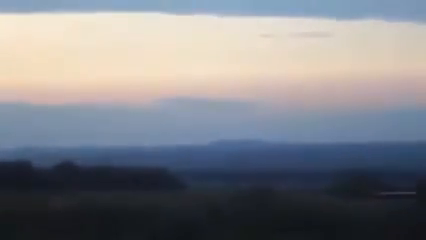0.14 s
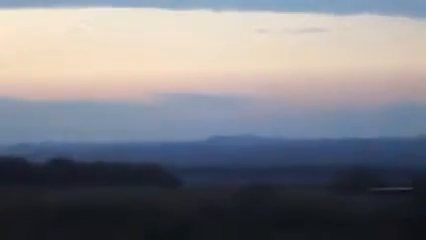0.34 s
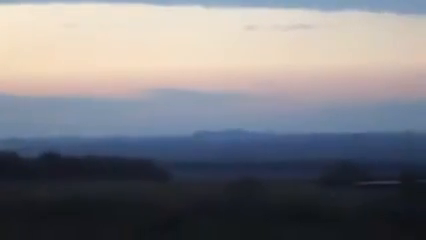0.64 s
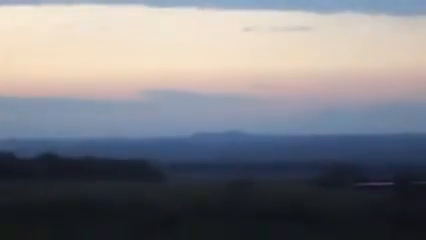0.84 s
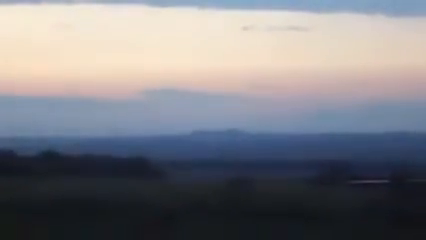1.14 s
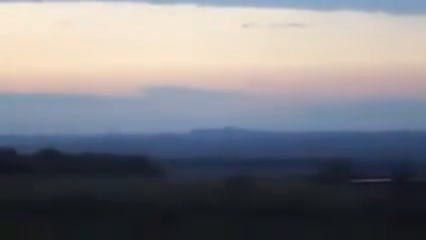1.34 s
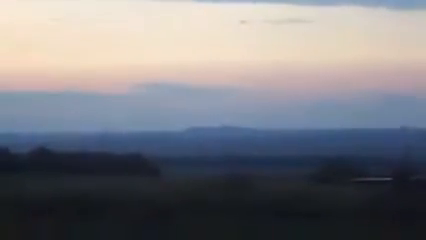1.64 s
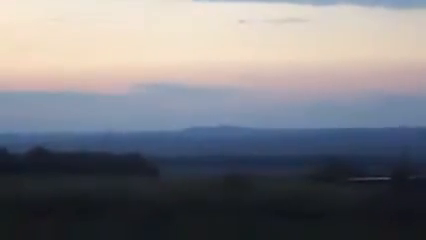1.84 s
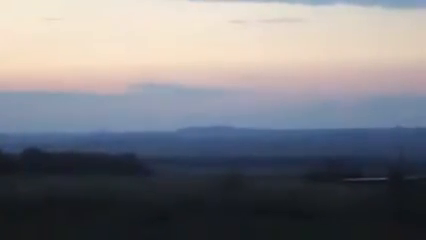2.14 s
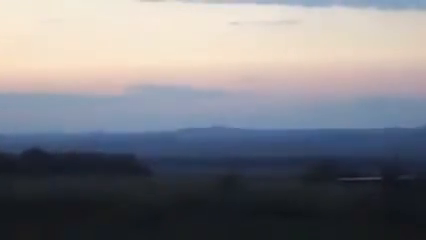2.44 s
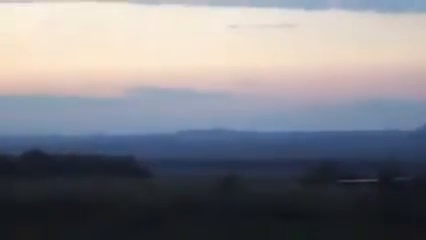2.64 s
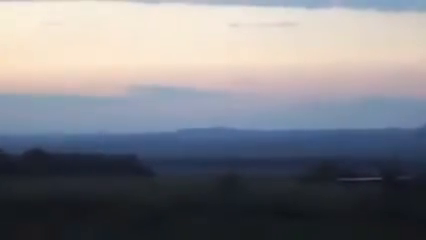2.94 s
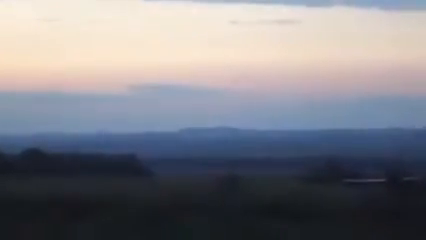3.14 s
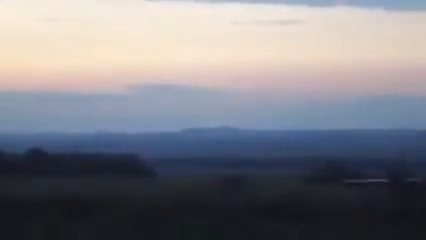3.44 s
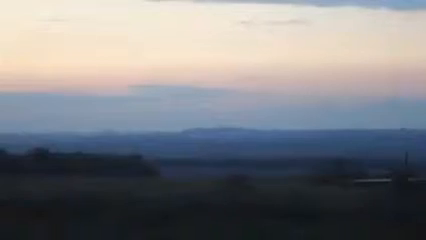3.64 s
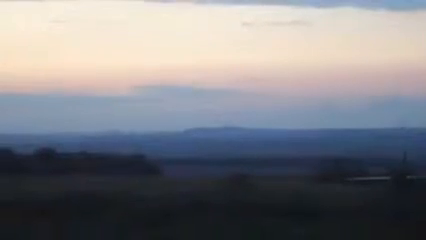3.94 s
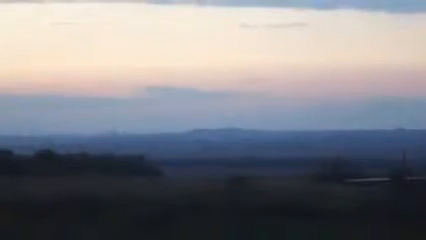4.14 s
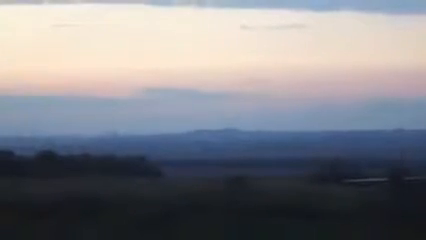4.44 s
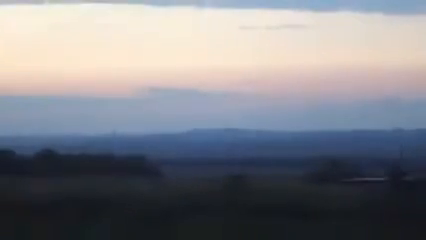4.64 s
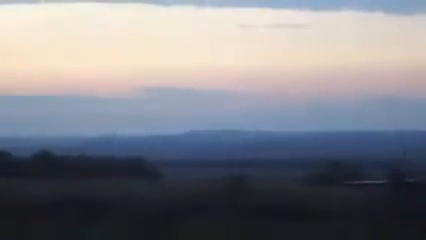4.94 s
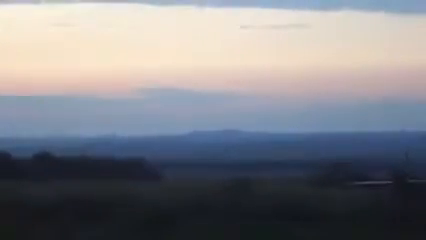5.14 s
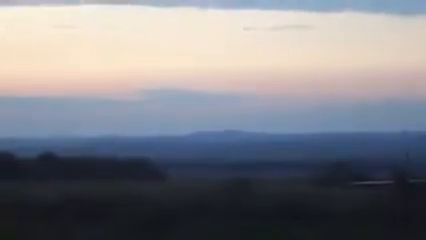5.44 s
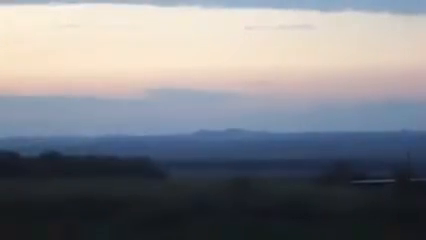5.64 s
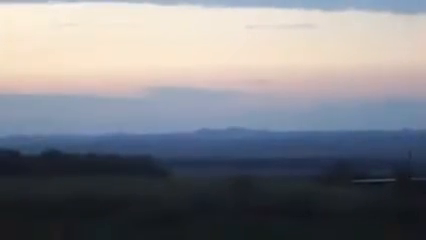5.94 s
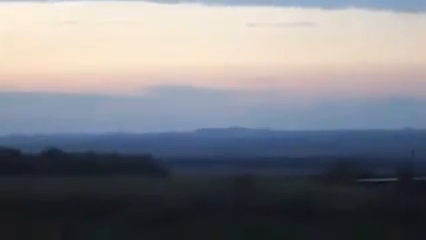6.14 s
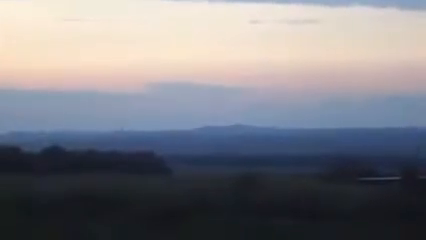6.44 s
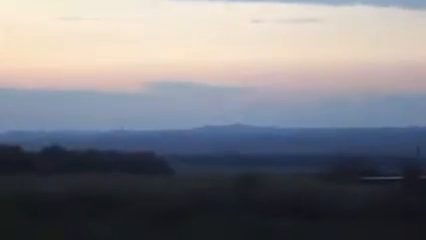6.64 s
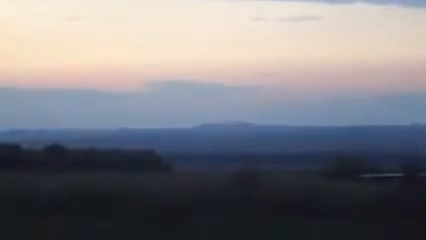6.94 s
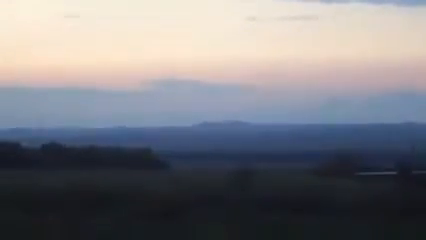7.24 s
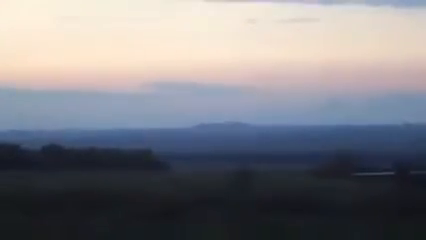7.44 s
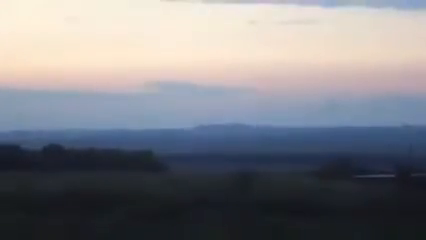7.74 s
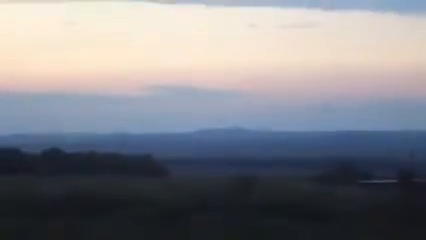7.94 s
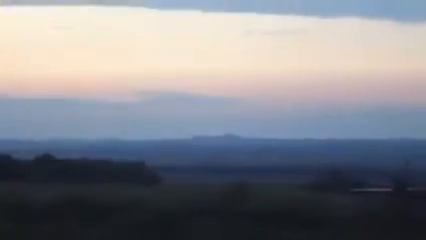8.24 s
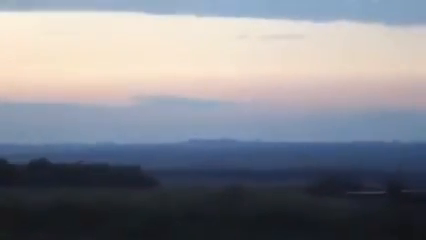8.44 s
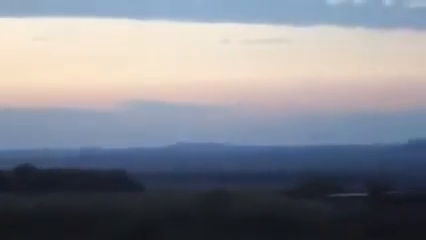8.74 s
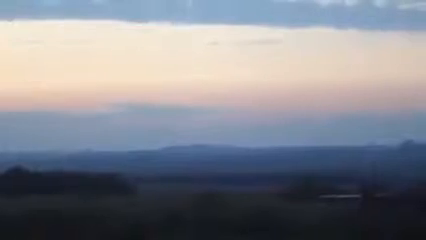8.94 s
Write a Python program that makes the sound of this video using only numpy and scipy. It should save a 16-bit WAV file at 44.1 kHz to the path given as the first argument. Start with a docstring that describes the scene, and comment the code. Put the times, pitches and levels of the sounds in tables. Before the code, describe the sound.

A heavy gun blast cracks and thuds at once from far across open fields, its echo rolling off hills. After about two seconds a second, denser blast arrives, and a third less than a second later, both dissolving into long dull rumble. Underneath are steady airy hush, high cricket rasp, faint short bird whistles and small handling ticks on a hand-held microphone, most noticeable near eight seconds.

```python
"""Distant heavy guns boom over open country at dusk: each blast arrives as a bunch of fronts by different
paths, then rolls on in echoes from hills and woods. Fronts are pressure pulses; bunches, roll and deep
boom are random reflections, filtered and shaped. Bush crickets rasp in the grass as gated noise, a small
bird calls now and then in bent sine whistles, and a hand-held camera body ticks as resonant noise.
Steady noise gives the hush of the fields."""
import sys
import numpy as np
from scipy import signal
from scipy.fft import rfft, irfft
from scipy.io import wavfile
from scipy.ndimage import uniform_filter1d

SR = 44100
rng = np.random.default_rng(int(sys.argv[2]) if len(sys.argv) > 2 else 0)


def file_out(sig):
    """Save sig as 16-bit WAV at sys.argv[1]."""
    # one column per channel
    cols = np.atleast_2d(sig).T
    # limit, then scale
    lim = np.clip(cols, -1, 1)
    pcm = np.round(lim * 32767).astype(np.int16)
    wavfile.write(sys.argv[1], SR, pcm)


N = 400869  # length of the scene, samples

# single fronts that stand out of the bunches: onset t/s, peak level/dB, treble corner f/Hz
FRONTS = [(0.0134, -9.5, 1300), (0.0156, -11.5, 1350), (0.0241, -9.5, 1300), (0.0611, -18, 594),
          (2.0329, -12.5, 1080), (2.0715, -7, 1300), (2.1086, -15, 2600), (2.122, -12.5, 4500),
          (2.1406, -14.5, 2600), (2.9091, -12, 3600), (2.9297, -17, 1100)]
PHASE_MS = 1.5  # positive phase of a front
# bunches of arrivals: peak t/s, level/dB, fall to a tenth t/ms, centre f/Hz
BUNCHES = [(.018, -15.5, 29, 280), (.02, -25.5, 29.4, 1350), (.058, -16, 26, 232), (.096, -27, 22, 235),
           (0.129, -26, 22, 235), (.216, -32.5, 52, 920), (.53, -42, 35, 550), (.757, -33.5, 30, 237),
           (1.756, -40, 26, 650), (1.768, -31.5, 42, 238), (2.026, -23.5, 18, 600), (2.035, -14, 16, 600),
           (2.046, -29.5, 21, 1300), (2.071, -17, 26, 546), (2.086, -18.5, 22.4, 650),
           (2.103, -16, 36, 520), (2.095, -29, 40, 1700), (2.121, -24, 24, 1710), (2.138, -15, 12, 450),
           (2.173, -23, 26, 400), (2.241, -23, 37, 447), (2.293, -25.5, 50, 500), (2.35, -28, 65, 900),
           (2.467, -24, 38, 440), (2.864, -27, 15, 330), (2.884, -24.5, 30, 1300), (2.9, -15.5, 22.8, 1130),
           (2.907, -12.5, 7.5, 380), (2.931, -20, 8.5, 700), (2.95, -21.5, 80, 450), (3.01, -25, 48, 394),
           (3.122, -22.5, 35, 250), (3.205, -35, 34, 1020), (3.35, -41, 33, 450), (3.445, -32.5, 58, 570),
           (3.593, -33.5, 13, 647), (3.765, -34, 31, 300), (3.82, -30, 55, 457), (3.865, -38.5, 90, 57.7),
           (3.87, -34.5, 80, 260), (4.01, -42, 30, 350), (4.306, -41.5, 42, 224), (5.172, -44, 52, 397),
           (6.175, -48, 55, 270), (6.469, -50, 40, 310), (6.859, -49.5, 40, 240), (7.295, -45.5, 85, 243),
           (8.942, -51, 62, 230)]
# width of the range a reflector favours, low bunches being narrow thuds: centre f/Hz, width/octave
BREADTH = [(58, 0.61), (230, 0.29), (300, 0.83), (450, 1.16), (650, 1.02), (1130, 0.87), (1700, 1.5)]
RISE_SHARE = 0.33  # rise time of a bunch over its fall time
# colour of a blast after the ground, the air and the microphone: f/Hz, relative level/(dB per Hz)
BLAST_SPECTRUM = [(82, -43), (140, -14.5), (226, 3), (291, 1), (417, -3.5), (694, 1), (759, -4.5),
                  (922, -9), (1360, -13), (1650, -21.5), (1920, -20.5), (2260, -29.5), (2630, -29),
                  (3390, -43.5), (5000, -54), (6500, -84), (11000, -120)]
# blasts: t/s, swell/s, roll level/dB, fade/(dB/s), extra air loss/(dB/kHz),
# deep boom level/dB, swell of the boom/s, fade of the boom/(dB/s)
BLASTS = [(-.02, 0.018, -29.5, 18, 1.5, -36.5, 0.033, 24), (1.15, 0.34, -48, 4, -2, -58.5, .4, 10.5),
          (2.018, .04, -25, 16, 0.5, -42.5, .1, 24), (2.05, 0.068, -19.5, 106, 2, -43, .09, 41),
          (2.859, 0.027, -25, 23, -1.5, -32.5, 0.11, 52), (3.4, .08, -40.5, 30, 4, -42.5, 0.049, 52),
          (3.76, 0.072, -40, 35.5, 3.5, -46, 0.051, 58), (5.9, .4, -58.5, 4.5, 13, -66, .45, 12),
          (7.0, 0.16, -59, 11.5, 2, -73, .2, 11)]
# unevenness of the terrain, as a spectrum of level wander: f/Hz, relative level/dB
TERRAIN_SPECTRUM = [(2, -17.5), (6, 18.5), (30, 1.5), (60, -81.5)]
ECHOES_PER_S = 4000  # mean rate of reflections
# farthest slopes answer weakly (dB re the blast), long and ever duller
FAR_DB, FAR_FADE_DB_PER_S, LOSS_DB_PER_KHZ_S = -28.5, 3.0, 1.3
# deep boom that swells behind each blast: f/Hz, relative level/(dB per Hz)
DEEP_SPECTRUM = [(12, -53.5), (20, -20), (43, -10.5), (91, 0), (107, 5), (129, -6.5), (150, -1), (200, -32),
                 (330, -120)]
BOOM_FAR_DB, BOOM_FAR_FADE_DB_PER_S = -31.5, 3.0  # weak slow fade of the boom, dB re the boom

# rasp of the cricket wings: f/Hz, relative level/(dB per Hz)
WING_SPECTRUM = [(4500, -32.5), (5500, -25.5), (6900, -12.5), (7400, -8.5), (7800, -2.5), (8300, 5),
                 (8700, 3.5), (9050, -7), (9370, -54), (10000, -48.5)]
# mean level of the rasp, with dips: t/s, level/dB
CHORUS_LEVEL = [(0, -60), (.17, -50), (1.1, -49.5), (2.05, -52), (2.15, -57.5), (2.5, -59.5), (2.6, -49.5),
                (2.86, -48.5), (2.95, -55.5), (3.1, -48), (4.3, -50), (5.5, -49.5), (6.5, -48.5),
                (7.5, -48), (8.2, -50), (9.09, -47.5)]
# singers near enough to throb: wing strokes f/Hz, strokes a phrase (rounded), level re unit noise/dB
SINGERS = [(23.04, 2.3, -4.5), (29.16, 4.3, -5), (61, 7, -17), (86.1, 7.6, -8)]
# wander of a singer's rate and strength: f/Hz, relative level/dB
DRIFT_SPECTRUM = [(.1, 1), (1.5, -9), (4, -46)]
# waver of the whole chorus as singers come and go: f/Hz, relative level/dB
WAVER_SPECTRUM = [(1.5, -19.0), (4, 5.5), (9, 2.0), (15, -57.5)]
# bird notes: t/s, start f/Hz, size of the downward bend f/Hz
NOTES = [(1.178, 4760, 300), (4.172, 4560, 450), (6.28, 4530, 420), (7.243, 4660, 380), (7.504, 4740, 260),
         (8.218, 4580, 360), (8.325, 4730, 380), (9.038, 4820, 400)]
NOTE_DB, NOTE_S = -57.5, 0.06  # peak of the direct whistle, and its length
# ticks and scrapes of the camera body: t/s, peak level/dB, pitch f/Hz, length/ms
TICKS = [(.184, -43, 4500, 4.5), (.684, -40, 2680, 5.1), (1.984, -40, 3250, 3), (6.592, -39.5, 4600, 3.4),
         (6.731, -41, 6340, 3.8), (6.943, -45, 4300, 3.4), (8.059, -34.5, 1300, 7.2), (8.06, -41, 4200, 3),
         (8.066, -41, 5040, 40), (8.105, -34, 6800, 12), (8.111, -37.5, 4570, 18),
         (8.128, -27.5, 900, 0.76), (8.148, -41, 1200, 4.2), (8.91, -44, 3500, 2.4)]
CASING_Q, SNAP_HZ_MS = 3.0, 5000  # resonance width: pitch over Q, plus this over the length
# hush and hiss, read no higher than 5 kHz: f/Hz, relative level/(dB per Hz)
AIR_SPECTRUM = [(15, -41), (25, -30.5), (146, -6.5), (272, -2.5), (436, -3.5), (633, -3), (874, -5),
                (5230, -16), (7050, -16), (8390, 3), (9500, -18), (12400, -48), (20900, -120)]
AIR_DB = -52.5  # rms
EDGE_HZ = 9360  # upper band limit


def amp(db):
    """Level law: amplitude gain is ten to the power dB/20."""
    return 10 ** (np.asarray(db) / 20)


def evened(x):
    """Power normalisation: the mean square is scaled to 1."""
    return x / np.sqrt(np.mean(x ** 2) + 1e-20)


def read(points, hz):
    """Logarithmic frequency scale: a table is interpolated over log frequency."""
    f, value = np.transpose(points)
    return np.interp(np.log(hz + 1), np.log(f + 1), value)


def add(mix, s, sound):
    """Superposition: a sound adds to the mix from its arrival time."""
    part = mix[max(round(s * SR), 0):][:len(sound)]
    part += sound[:len(part)]


def coloured(x, points):
    """Linear filtering: each frequency is weighted by a spectrum table."""
    hz = np.fft.rfftfreq(len(x), 1 / SR)
    return irfft(rfft(x) * amp(read(points, hz)), len(x))


def echoes(count):
    """Random scattering: single reflections arrive by chance, with random sign and size."""
    chance, size, sign = rng.random((count, 3)).T
    present = chance < ECHOES_PER_S / SR
    return present * amp(-1.5 * np.log(size + 0.00077)) * np.sign(sign - .5)


def fading(t, s, swell, db, fade_db, far_db, far_fade_db):
    """Reverberant decay: power swells, fades exponentially, and leaves a weaker, separately fading tail."""
    after = np.maximum(t - s - swell, 0)
    rise = np.clip((t - s) / max(swell, .005), 0, 1) ** 2
    near = amp(db - fade_db * after) ** 2
    far = amp(db + far_db - far_fade_db * after) ** 2
    return rise * (near + far) + 1e-14


def fronts():
    """Blast wave: pressure jumps, then falls through zero; air rounds it, the microphone drops the deep part."""
    out, ms = np.zeros(N), np.arange(2048) / SR * 1000
    pulse = (1 - ms / PHASE_MS) * np.exp(-ms / PHASE_MS)
    for s, db, corner_hz in FRONTS:
        band = signal.butter(2, [300, corner_hz], "bandpass", fs=SR, output="sos")
        wave = signal.sosfilt(band, pulse)
        add(out, s, amp(db) * wave / abs(wave).max())
    return out


def bunches():
    """Multipath arrival: each strong path brings close reflections, its reflector favouring one range."""
    out, ms, hz = np.zeros(N), np.arange(8192) / SR * 1000, np.fft.rfftfreq(8192, 1 / SR)
    for s, db, fall, centre_hz in BUNCHES:
        rise, octaves = RISE_SHARE * fall, read(BREADTH, centre_hz)
        favour_db = -6 * (np.log2((hz + 1) / centre_hz) / max(octaves, .2)) ** 2
        # the blast colour counts at half its dB
        gain = amp(0.5 * read(BLAST_SPECTRUM, hz) + favour_db)
        burst = irfft(rfft(echoes(8192)) * gain)
        onset = np.sin(np.pi / 2 * np.clip(ms / rise, 0, 1)) ** 2
        shape = onset * amp(-20 * np.maximum(ms - rise, 0) / fall)
        # levelled where the burst is strong
        power = np.sum((burst * shape) ** 2) / np.sum(shape ** 2)
        add(out, s - rise / 1000, amp(db) * burst * shape / np.sqrt(power))
    return out


def roll():
    """Air absorption: reflections from far slopes grow duller as the paths lengthen."""
    time = np.arange(N) / SR
    power = np.array([fading(time, s, swell, db, fade, FAR_DB, FAR_FADE_DB_PER_S)
                      for s, swell, db, fade, *_ in BLASTS])
    loss = np.array([row[4] + LOSS_DB_PER_KHZ_S * np.maximum(time - row[0], 0) for row in BLASTS])
    # weighted by power, so the strongest echo counts most in the colour
    loss_db_per_khz = (power * loss).sum(0) / power.sum(0)
    hz, t, z = signal.stft(echoes(N), SR, nperseg=2048, noverlap=1536)
    # the loss stops growing above 3.5 kHz
    loss_db = np.interp(t, time, loss_db_per_khz) * np.minimum(hz, 3500)[:, None] / 1000
    gain = amp(read(BLAST_SPECTRUM, hz)[:, None] - loss_db)
    gain /= np.sqrt((gain ** 2).sum(0))  # colour only: the total gain stays even
    sound = evened(signal.istft(z * gain, SR, nperseg=2048, noverlap=1536)[1][:N])
    lumps = evened(coloured(rng.standard_normal(N), TERRAIN_SPECTRUM))
    return sound * np.sqrt(power.sum(0)) * amp(1.4 * lumps)


def boom():
    """Diffraction: the longest waves bend round obstacles and arrive as a slow swell."""
    time = np.arange(N) / SR
    power = sum(fading(time, s, swell, db, fade, BOOM_FAR_DB, BOOM_FAR_FADE_DB_PER_S)
                for s, *_, db, swell, fade in BLASTS)
    return evened(coloured(echoes(N), DEEP_SPECTRUM)) * np.sqrt(power)


def crickets():
    """Stridulation: wing strokes gate a rasp, one stroke a phrase being weak, over a far chorus."""
    t = np.arange(N) / SR
    rasp = amp(-2.0) * rng.standard_normal(N)  # far chorus
    for rate, count, db in SINGERS:
        drift = evened(coloured(rng.standard_normal(N), DRIFT_SPECTRUM))
        turns = rng.random() * count + np.cumsum(rate * (1 + 0.019 * drift)) / SR
        accent = np.where(turns % round(count) < 1, .35, 1)
        stroke = np.sin(np.pi * turns) ** 4 * accent
        rasp += amp(db) * evened(stroke * amp(3.0 * drift)) * rng.standard_normal(N)
    waver = evened(coloured(rng.standard_normal(N), WAVER_SPECTRUM))
    level_db = np.interp(t, *np.transpose(CHORUS_LEVEL)) + 0.93 * waver
    return evened(coloured(rasp, WING_SPECTRUM)) * amp(level_db)


def bird():
    """Frequency modulation: short whistles arch and bend down, roughened by echoes from leaves."""
    out = np.zeros(N)
    u = np.arange(round(NOTE_S * SR)) / (NOTE_S * SR)  # 0 to 1 through a note
    for s, start_hz, bend_hz in NOTES:
        turns = np.cumsum(start_hz + bend_hz * (.3 * u - 1.6 * u ** 2.2)) / SR
        add(out, s, amp(NOTE_DB) * np.sin(np.pi * u) ** 0.45 * np.sin(2 * np.pi * turns))
    ms = np.arange(2600) / SR * 1000
    leaves = rng.standard_normal(2600) * amp(-60 * ms / 140)  # 60 dB down in 140 ms
    scattered = signal.oaconvolve(out, leaves / np.linalg.norm(leaves))[:N]
    return out + amp(-6.0) * scattered


def ticks():
    """Damped resonance: brief scrapes of noise excite a broad resonance of the casing."""
    out, ms = np.zeros(N), np.arange(4096) / SR * 1000
    for s, db, hz, length in TICKS:
        width_hz = hz / CASING_Q + SNAP_HZ_MS / length
        b, a = signal.iirpeak(hz, hz / width_hz, SR)
        scrape = rng.standard_normal(4096) * (ms / length) * np.exp(-2 * ms / length)
        tick = signal.lfilter(b, a, signal.lfilter(b, a, scrape))
        add(out, s, amp(db) * tick / abs(tick).max())
    return out


def air():
    """Stationary noise: hush of the fields and hiss of the microphone, slightly patchy."""
    frames, hz = N // 256 + 5, np.fft.rfftfreq(1024, 1 / SR)
    a, b, patches = rng.standard_normal((frames, 513, 3)).T
    # smoothed over frequency, then over time
    patches = evened(uniform_filter1d(uniform_filter1d(patches, 14, 0), 10, 1))
    level_db = read(AIR_SPECTRUM, np.minimum(hz, 5000))[:, None] + 1.7 * patches
    z = (a + 1j * b) * amp(level_db)
    return amp(AIR_DB) * evened(signal.istft(z, nperseg=1024, noverlap=768)[1][:N])


def scene():
    """Superposition: the pressures of all sources add at one microphone."""
    guns = fronts() + bunches() + roll() + boom()
    return (guns + crickets() + bird() + ticks() + air())[None]


def record(dry):
    """Saturation and band limit: the small microphone rounds off the highest peaks, then the treble ends."""
    ceiling = .55  # full scale is 1
    rounded = dry / (1 + (abs(dry) / ceiling) ** 4) ** .25
    lowpass = signal.firwin(1023, EDGE_HZ, window=("kaiser", 10), fs=SR)
    return signal.oaconvolve(rounded, lowpass[None], "same")


dry = scene()
out = record(dry)
file_out(out)
```